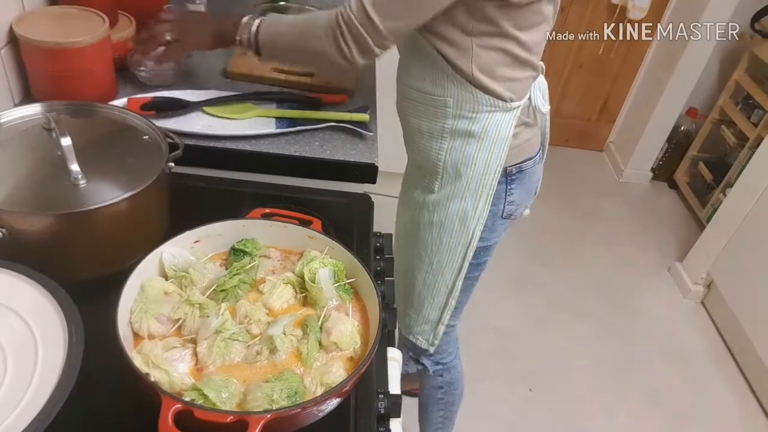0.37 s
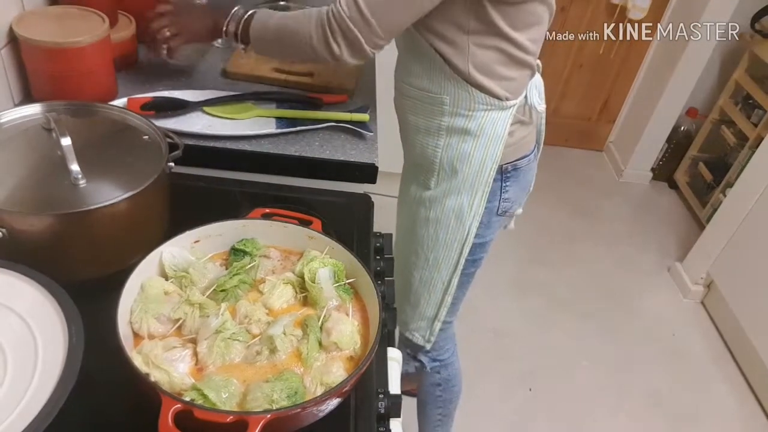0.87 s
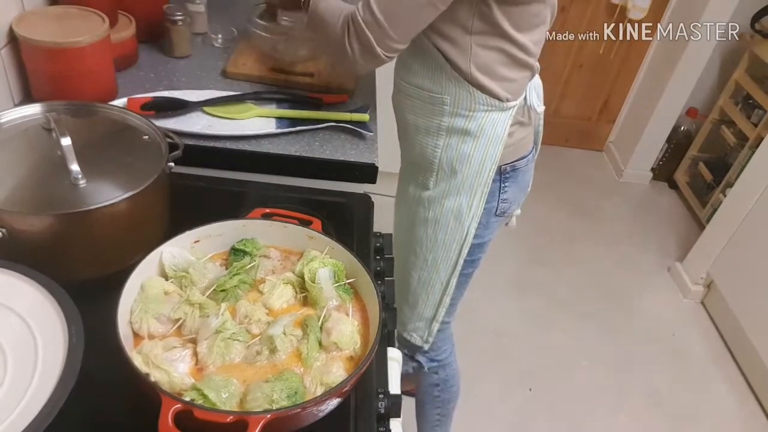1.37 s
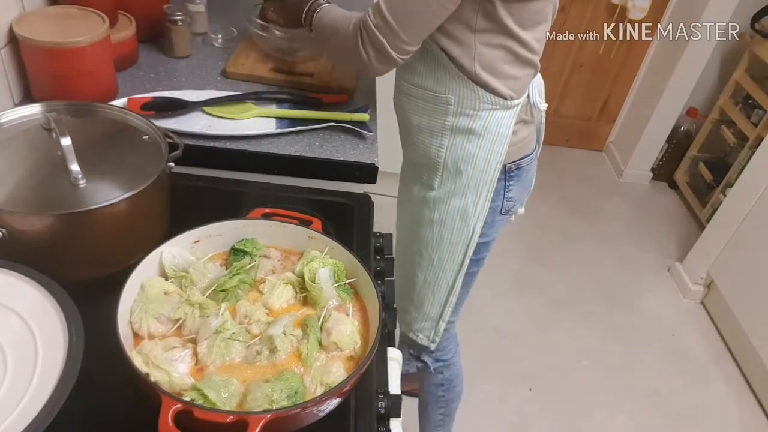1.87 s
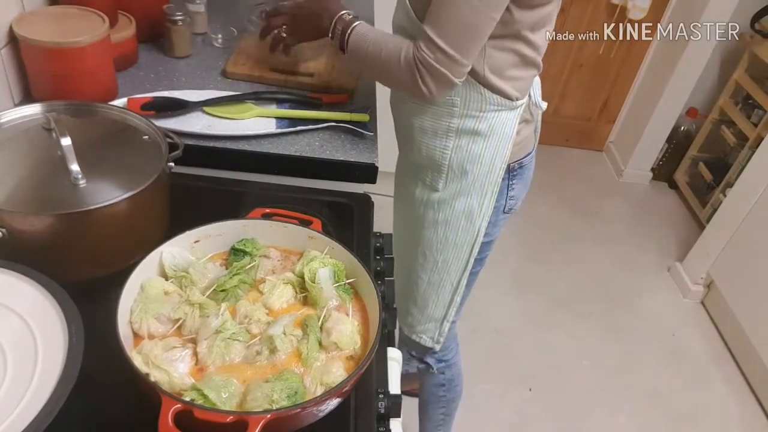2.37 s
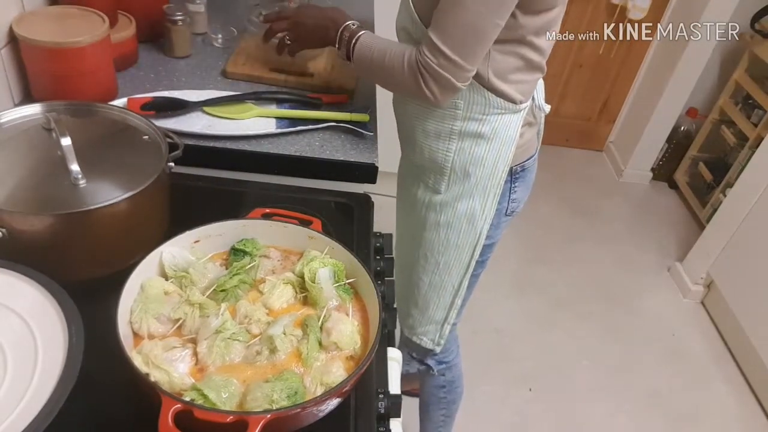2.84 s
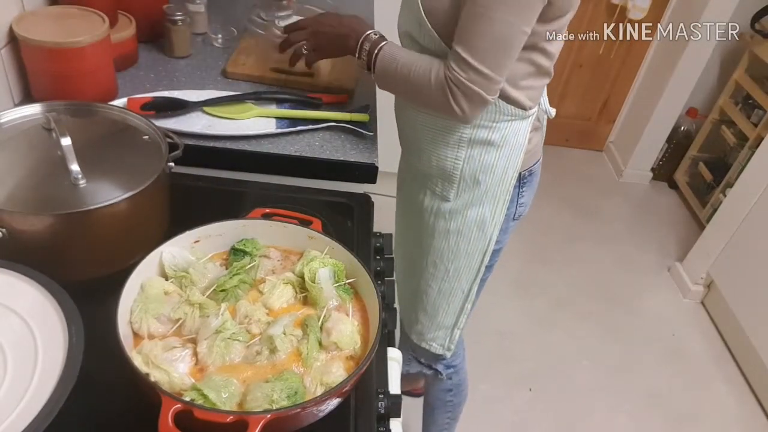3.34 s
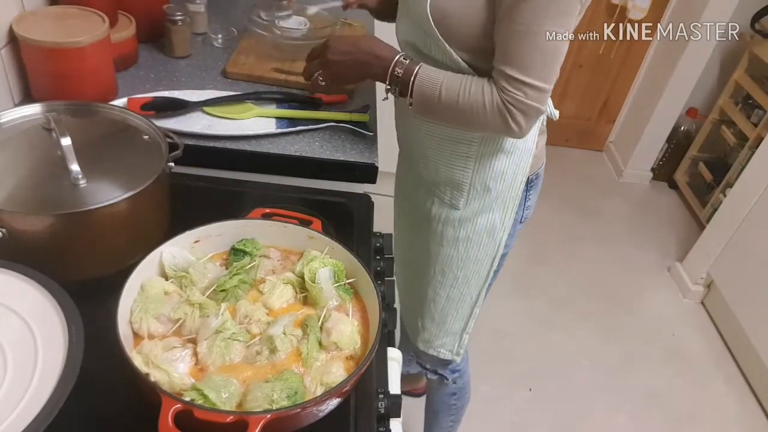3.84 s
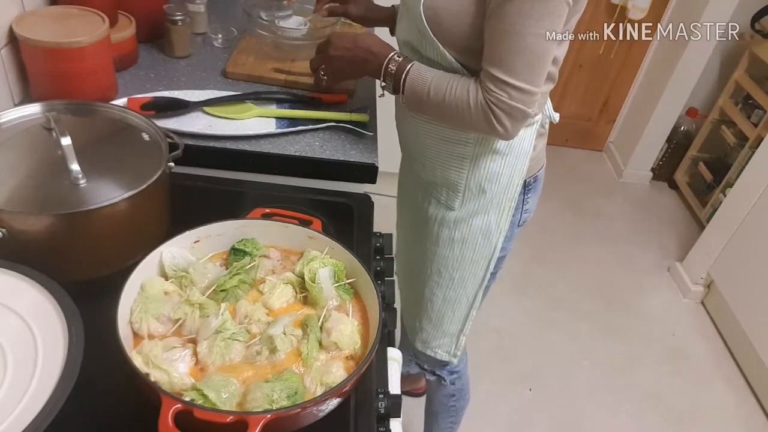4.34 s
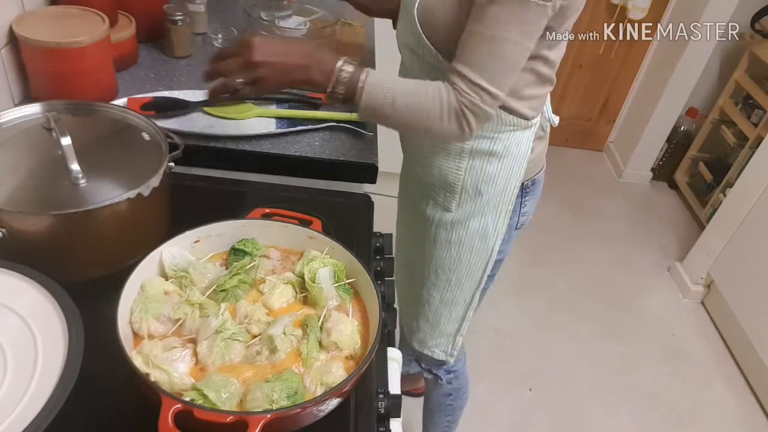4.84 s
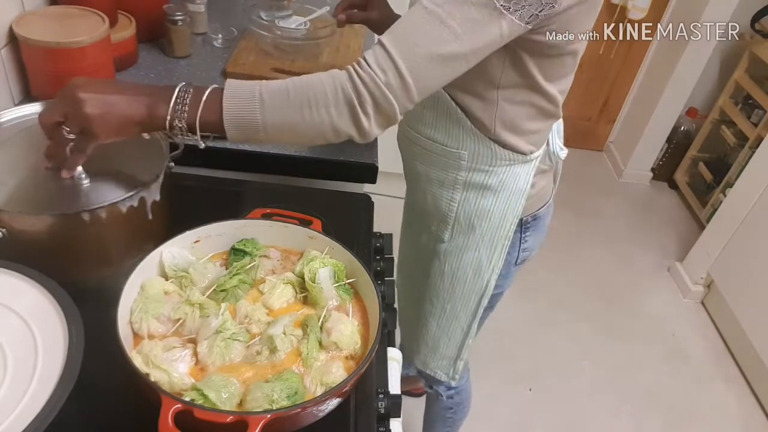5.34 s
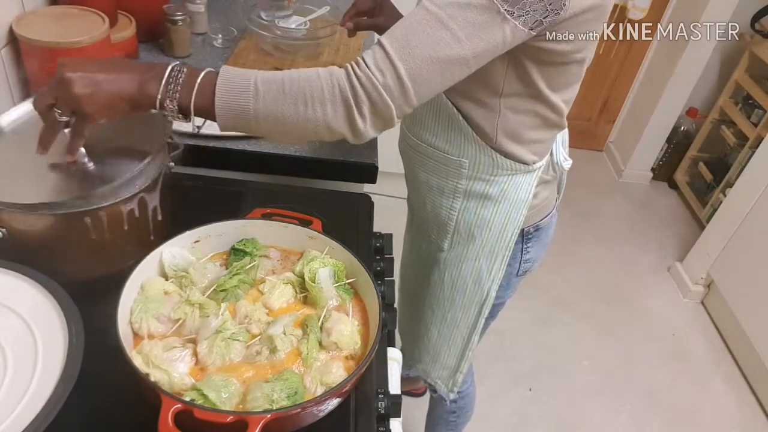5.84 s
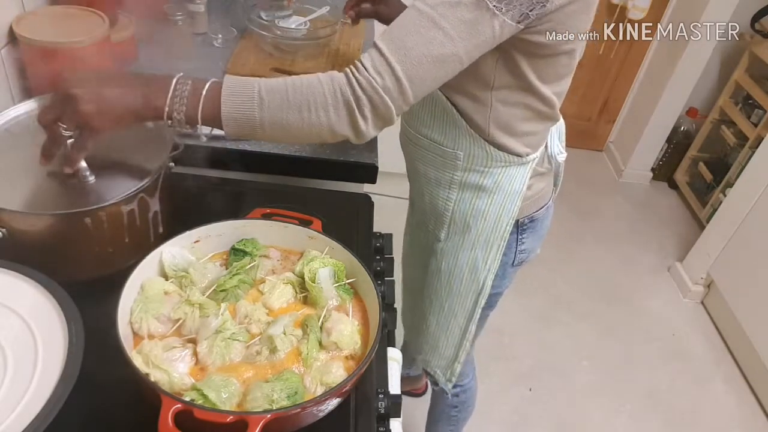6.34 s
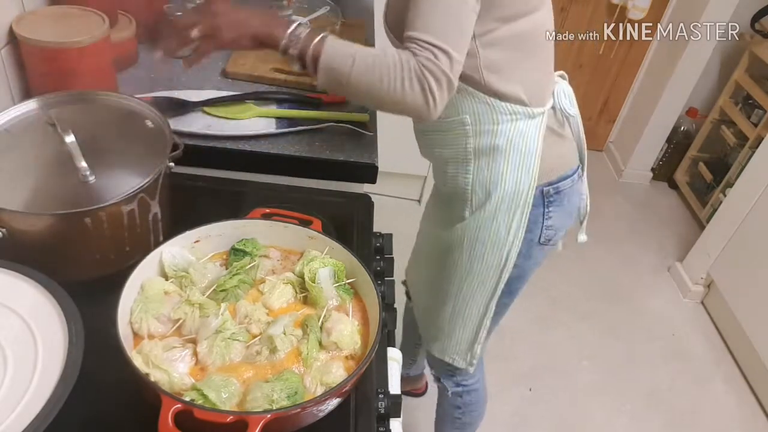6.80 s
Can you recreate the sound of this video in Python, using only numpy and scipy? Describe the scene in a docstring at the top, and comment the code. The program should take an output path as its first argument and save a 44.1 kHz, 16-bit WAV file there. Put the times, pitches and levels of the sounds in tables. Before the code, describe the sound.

In a hard-walled kitchen, glassware knocks and rings, bracelets clink, and a metal lid rattles above a quiet simmer.

```python
"""A kitchen with hard walls, heard by two spaced microphones above the hob, over simmering pots and small ticks.
A wooden board is knocked, metal bangles and a cup clink, then a glass bowl, a dish and a basin are set down.
The boil surges, a glass rings, bangles clink again and a steel lid and rim clatter until about 6.2 s;
then the pots and a sleeve rustle on. Every blow is a short knock of filtered noise plus decaying sine modes;
decaying noise, convolved with the blows and ticks, makes the room that holds them for half a second."""
import sys
import numpy as np
from scipy import signal
from scipy.fft import rfft, irfft, next_fast_len
from scipy.io import wavfile
from scipy.ndimage import uniform_filter1d

SR = 44100
rng = np.random.default_rng(int(sys.argv[2]) if len(sys.argv) > 2 else 0)


def generate_wav(sig):
    """Save sig (samples, or channels by samples) to the path in sys.argv[1] as 16-bit PCM at SR."""
    pcm = np.round(np.clip(np.atleast_2d(sig).T, -1, 1) * 32767).astype(np.int16)
    wavfile.write(sys.argv[1], SR, pcm)


def boost(x):
    """Linear amplitude factor 10**(x/20) for a level x in decibels (scalar or array-like)."""
    u = np.asarray(x, float) / 20
    return 10 ** u


N = 317079


def curve(points, hz):
    """Log-frequency interpolation: a (Hz, value) table is read on a log axis."""
    f, values = np.transpose(points)
    return np.interp(np.log(np.maximum(hz, 1)), np.log(f), values)


def shape(x, gain):
    """Linear filtering: the spectrum of the last axis is multiplied by a gain that is a function of Hz."""
    n = next_fast_len(x.shape[-1])
    hz = np.arange(n // 2 + 1) * SR / n
    return irfft(rfft(x, n) * gain(hz), n)[..., :x.shape[-1]]


def unit(x):
    """Normalization: scales a signal to rms 1."""
    return x / np.sqrt(np.mean(x ** 2))


def pair(n):
    """Spatial coherence: noise at two spaced microphones is alike in the bass, unrelated above."""
    alike_hz = 525  # well below this both microphones hear the same
    mid, side = rng.standard_normal((2, n))
    side = shape(side, lambda hz: 1 / np.sqrt(1 + (alike_hz / np.maximum(hz, 1)) ** 2.56))
    return mid + side * np.array([[1], [-1]])


def walk(rate):
    """Random modulation: levels drawn every 1 / rate s and joined by ramps; spread near 1."""
    hold = int(SR / rate)
    steps = np.repeat(rng.standard_normal(N // hold + 1), hold)
    return 1.2 * uniform_filter1d(steps, hold)[:N]


def swells(rows, steady_db):
    """Power addition: the gain of a steady sound plus smooth raised-cosine bumps."""
    t, power = np.arange(N) / SR, boost(steady_db) ** 2
    for s, length, db in rows:
        phase = np.pi * np.clip((t - s) / (2 * length), -.5, .5)
        power = power + (boost(db) * np.cos(phase) ** 2) ** 2
    return np.sqrt(power)


def add(track, s, sound):
    """Superposition: mixes a sound into a track from time s."""
    i = int(s * SR)
    track[..., i:i + sound.shape[-1]] += sound[..., :N - i]


def ringing_modes(modes, flutter):
    """Modal decay: each mode is a sine dying exponentially, at both microphones."""
    hz, _, t60 = np.array(modes)[:, :, None]
    t = np.arange(SR * 3 // 4) / SR
    # above the bass a mode reaches the two microphones a quarter turn apart
    skew = np.pi / 4 * np.clip((hz / 600) ** 2, 0, 1) * (-1) ** np.arange(len(hz))[:, None]
    rings = np.array([np.sin(2 * np.pi * hz * t + ear * skew) for ear in (1, -1)])
    rings = rings * 1000. ** (-t / t60) * (1 - np.exp(-t / 0.0011))
    # slow noise stands for worktop and wall echoes beating with each mode; long rings stay steadier
    beats = unit(shape(rng.standard_normal(rings.shape), lambda f: 1 / (1 + (f / 70) ** 4)))
    depth = flutter * np.clip(0.047 / t60, 0, 1) * np.clip(t / 0.068, 0, 1)
    return rings * (1 + depth * beats)


def knock(colour, knock_s, tilt_db, centre_hz):
    """Impact excitation: a crackling contact close by, and one clap of the same colour for the walls."""
    t = np.arange(1024) / SR
    contact = np.zeros((2, 4096))
    contact[0, 1024:2048] = rng.standard_normal(1024) * np.exp(-t / knock_s)
    contact[1, 1068] = np.sqrt(knock_s * SR / 2)

    def gain(f):
        return boost(curve(colour, f) + tilt_db * np.log2(np.maximum(f, 40) / centre_hz))

    return shape(contact, gain)[:, 980:]  # the crackle starts 1 ms in


def thing(blows, modes, colour, knock_s, flutter, ring_room_db, knock_room_db):
    """Modal synthesis: each blow rings the modes and makes a short knock; a positive tilt brightens both."""
    hz, mode_db, _ = np.array(modes)[:, :, None]
    t = np.arange(SR * 3 // 4) / SR
    rings = ringing_modes(modes, flutter)
    centre_hz = np.exp(np.mean(np.log(hz)))
    near, walls = np.zeros((2, N)), np.zeros(N)
    for s, db, knock_db, tilt_db, pan_db in blows:
        weight = boost(mode_db + tilt_db * np.log2(hz / centre_hz))
        ring = np.sum(rings * weight, axis=1) / np.sqrt(np.sum(weight ** 2)) * boost(db - 6.0)
        crackle, clap = knock(colour, knock_s, tilt_db, centre_hz)
        size = boost(db + knock_db - 8) * np.sqrt(knock_s * SR / 2 / np.sum(clap ** 2))
        sides = boost(np.array([[pan_db], [-pan_db]]) / 2)
        add(near, s, ring * sides)
        add(near, s - .001, crackle * size * sides)
        # the loud first moments of the ring fill the room with a rough band round each mode
        add(walls, s, ring[0] * np.exp(-t / 0.0099) * boost(ring_room_db + 3))
        add(walls, s - .001, clap * size * boost(knock_room_db))
    return near + signal.fftconvolve(walls[None], room(), axes=1)[:, :N]


# Blows on the wooden board. Each row: start in seconds, ring level in dB, knock against ring in dB,
# brightness tilt in dB per octave, lean to the left in dB.
BOARD_HITS = [(.004, -52.5, 38.5, 1.5, -1.8)]
# Modes of the board. Three rows: frequencies in Hz, relative levels in dB, t60 in seconds.
BOARD_MODES = [(130, 410, 640), (-3, -3, -3), (.2, .2, .2)]
# Colour of its knock. Each row: frequency in Hz, gain in dB.
BOARD_COLOUR = [(24, -37), (40, 13), (344, -0.5), (593, -0.5), (744, 1.5), (1230, -13), (1640, -15.5),
                (9000, -51), (11700, -77), (19800, -120)]


def board():
    """Heavy damping: three low modes lie far under the knock."""
    return thing(BOARD_HITS, BOARD_MODES, BOARD_COLOUR, 0.0024, .3, ring_room_db=6, knock_room_db=8.5)


# Blows on the bangles. Each row: start in seconds, ring level in dB, knock against ring in dB,
# brightness tilt in dB per octave, lean to the left in dB.
BANGLE_HITS = [(.428, -48, -1, 2, -1.5), (.445, -22, -1.5, 5.5, 1.5), (.503, -27.5, 4, 13, 2.3),
               (.599, -37.5, -2, 1, 1.5), (.631, -35, -2, 5, 1.5), (.874, -34, -2.5, 3, 0.87),
               (5.079, -23, 2, 1, 0.2), (5.206, -24.5, -6, 5, -1.5), (5.28, -39, 14, -11, -1.5)]
# Modes of the bangles. Three rows: frequencies in Hz, relative levels in dB, t60 in seconds.
BANGLE_MODES = [(6120, 6200, 6270, 10420, 10510, 12650, 13700), (-5, -.6, -6, -6, -9, -9, -16),
                (.08, .3, .08, .08, .12, .05, .04)]
# Colour of their knock. Each row: frequency in Hz, gain in dB.
BANGLE_COLOUR = [(1760, -59), (3000, -16), (6130, 3.5), (7030, -1.5), (10600, -1), (15500, -11.5)]


def bangles():
    """High modes of small metal: every mode lies above 6 kHz."""
    return thing(BANGLE_HITS, BANGLE_MODES, BANGLE_COLOUR, 0.0023, 0.96, ring_room_db=-2.0, knock_room_db=4.0)


# Blows on the cup. Each row: start in seconds, ring level in dB, knock against ring in dB,
# brightness tilt in dB per octave, lean to the left in dB.
CUP_HITS = [(0.4871, -24.5, -18, -0.12, -2), (0.5037, -37, 4, -0.59, 13)]
# Modes of the cup. Three rows: frequencies in Hz, relative levels in dB, t60 in seconds.
CUP_MODES = [(2336, 2557, 3150, 3623, 4172, 5400), (-1.5, -.6, -9, -14, -9, -1),
             (.1, .1, .08, .08, .25, .04)]
# Colour of its knock. Each row: frequency in Hz, gain in dB.
CUP_COLOUR = [(590, -47), (1000, -11), (3940, -16), (4280, -8), (4550, -15), (6000, 1), (7800, -35),
              (13200, -120)]


def cup():
    """Unequal damping: one middle mode outlasts the others."""
    return thing(CUP_HITS, CUP_MODES, CUP_COLOUR, 0.0015, 0.3, ring_room_db=0.5, knock_room_db=10)


# Blow on the bowl. Each row: start in seconds, ring level in dB, knock against ring in dB,
# brightness tilt in dB per octave, lean to the left in dB.
BOWL_HITS = [(1.678, -6, -4, -0.12, -2.5)]
# Modes of the bowl. Three rows: frequencies in Hz, relative levels in dB, t60 in seconds.
BOWL_MODES = [(812, 1434, 1545, 1625, 1912, 2437, 3120, 3908, 5185, 8120, 9911, 11340, 13330),
              (-3, -9, -8, -3, -8, 1, 0, -2.5, -17, -4, -12, -24, -24),
              (.06, .06, .15, .06, .06, .06, .04, .45, .4, .12, .12, .1, .08)]
# Colour of its knock. Each row: frequency in Hz, gain in dB.
BOWL_COLOUR = [(24, -48), (40, -14), (496, -16.5), (686, -8), (3650, -17.5), (4030, -13.5), (4920, -22),
               (8310, -25), (13700, -40), (15500, -64)]


def bowl():
    """Unequal damping: short low modes give way to two lasting ones near 4 and 5 kHz."""
    return thing(BOWL_HITS, BOWL_MODES, BOWL_COLOUR, 0.003, 0.26, ring_room_db=2.5, knock_room_db=9.0)


# Blow on the dish. Each row: start in seconds, ring level in dB, knock against ring in dB,
# brightness tilt in dB per octave, lean to the left in dB.
DISH_HITS = [(2.242, -11, -6.5, -0.1, -2.1)]
# Modes of the dish. Three rows: frequencies in Hz, relative levels in dB, t60 in seconds.
DISH_MODES = [(818, 1722, 1785, 2040, 2294, 2440, 2617, 3930, 4215, 9695),
              (-12, 1.5, -.6, -3, -4, -3, -3, -10, -11, -28),
              (.08, .07, .06, .06, .05, .04, .05, .2, .04, .15)]
# Colour of its knock. Each row: frequency in Hz, gain in dB.
DISH_COLOUR = [(35, -49), (60, -11.5), (849, -8), (1150, -3), (2360, -3), (4030, -10), (8870, -32),
               (9970, -28), (15500, -36)]


def dish():
    """Strong damping: crowded modes round 2 kHz die quickly after a very short contact."""
    return thing(DISH_HITS, DISH_MODES, DISH_COLOUR, 0.00063, 0.33, ring_room_db=4.5, knock_room_db=13.5)


# Blows on the basin. Each row: start in seconds, ring level in dB, knock against ring in dB,
# brightness tilt in dB per octave, lean to the left in dB.
BASIN_HITS = [(2.504, -28, -2, 2, 1), (2.573, -15, -25, -2.5, 1.3), (2.582, -9, -10, 2.5, 0.51),
              (2.597, -19, -3, 3, .6), (2.631, -29, 6.5, 2, 1.1), (2.664, -15.5, -43, -2, -1.4),
              (2.69, -48, 6, 2, .6), (2.722, -36.5, 2.5, 2, .6), (3.178, -14.5, -13.5, 1, 0.52),
              (3.251, -28, -15, 5, 1.5)]
# Modes of the basin. Three rows: frequencies in Hz, relative levels in dB, t60 in seconds.
BASIN_MODES = [(705, 1546, 1630, 2080, 2830, 2900, 4303, 4370, 5001, 6010, 8040, 9308, 10000, 12130),
               (-4, -4, -2, -4, -2, -3, -1, -1, -16, -9, -13, -22, -21, -23),
               (.08, .12, .14, .1, .1, .06, .2, .07, .1, .11, .06, .06, .06, .06)]
# Colour of its knock. Each row: frequency in Hz, gain in dB.
BASIN_COLOUR = [(24, -53), (40, -44), (117, 12.5), (484, -3.5), (704, 4), (1410, -1.5), (1560, 2.5),
                (4350, -11.5), (6640, -26), (15500, -36)]


def basin():
    """Repeated impact: a run of blows rings the same widely spread modes."""
    return thing(BASIN_HITS, BASIN_MODES, BASIN_COLOUR, 0.0041, 0.17, ring_room_db=0.0, knock_room_db=13)


# Blow on the glass. Each row: start in seconds, ring level in dB, knock against ring in dB,
# brightness tilt in dB per octave, lean to the left in dB.
GLASS_HITS = [(4.175, -16, -9.5, -0.3, 1)]
# Modes of the glass. Three rows: frequencies in Hz, relative levels in dB, t60 in seconds.
GLASS_MODES = [(5183, 5430, 5610, 12768), (-.6, -4, -6, -2.5), (.33, .05, .12, .27)]
# Colour of its knock. Each row: frequency in Hz, gain in dB.
GLASS_COLOUR = [(1500, -13), (3000, -5), (6000, -2), (9000, -6), (10000, -12), (12000, 5), (14000, -34)]


def glass():
    """Sparse modes: a few high, lightly damped ones make a clear ping."""
    return thing(GLASS_HITS, GLASS_MODES, GLASS_COLOUR, .0012, 0.33, ring_room_db=4, knock_room_db=8.5)


# Blows of the steel lid. Each row: start in seconds, ring level in dB, knock against ring in dB,
# brightness tilt in dB per octave, lean to the left in dB.
LID_HITS = [(5.265, -23, 1, 0.3, 0.29), (5.335, -29.5, 0.5, -2.5, .3), (5.428, -23.5, 2, 0.2, -1.3),
            (5.46, -25, -8.5, 10.5, .6), (6.053, -17, 2, 2.6, -1.4), (6.075, -15, -24, 3, 0.36),
            (6.098, -15, -20, 2.5, 0.19), (6.129, -18, -0.5, 2, -2), (6.155, -19.5, -21, 6.5, 0.6),
            (6.18, -19.5, -14, 4, 0.73)]
# Modes of the lid. Three rows: frequencies in Hz, relative levels in dB, t60 in seconds.
LID_MODES = [(120, 148, 330, 660, 750, 1026, 1042, 1280, 1340, 1385, 2350, 3165, 3760),
             (-2, -2, -6, -5, -6, 0, -6, -8, -5, -5, -15, -20, -20),
             (.12, .12, .08, .08, .06, .4, .06, .05, .06, .06, .04, .05, .03)]
# Colour of its knock. Each row: frequency in Hz, gain in dB.
LID_COLOUR = [(40, -42), (130, -1), (400, 3.5), (900, -6), (2000, -7.5), (4000, -13.5), (8000, -18.5),
              (12000, -20), (15500, -26.5)]


def lid():
    """Plate-like modes: low, short ones surround one lasting mode near 1 kHz."""
    return thing(LID_HITS, LID_MODES, LID_COLOUR, 0.0029, 1.0, ring_room_db=3.5, knock_room_db=8.5)


# Blows on the rim. Each row: start in seconds, ring level in dB, knock against ring in dB,
# brightness tilt in dB per octave, lean to the left in dB.
RIM_HITS = [(5.383, -31, .6, 0, -1.5), (5.645, -38, .6, 2, 1.5), (5.897, -18, 1.8, 3, 0.9),
            (5.913, -23, 0.68, -1.1, 0.15)]
# Modes of the rim. Three rows: frequencies in Hz, relative levels in dB, t60 in seconds.
RIM_MODES = [(118, 1560, 3180, 4100, 5030, 6590, 7720, 8230, 10600, 12100),
             (-.5, -3, -9, -9, -9, -14, -9, -11, -13, -9),
             (.18, .15, .07, .1, .08, .08, .08, .08, .08, .12)]
# Colour of its knock. Each row: frequency in Hz, gain in dB.
RIM_COLOUR = [(40, -28), (120, -1.5), (600, -8), (1500, -4), (1900, -18), (3000, -11), (8000, -20.5),
              (15500, -21.5)]


def rim():
    """Wideband modes: one low thump and a ladder of higher partials."""
    return thing(RIM_HITS, RIM_MODES, RIM_COLOUR, 0.0017, 0.17, ring_room_db=-4.0, knock_room_db=14)


def ping(t, db, hz, cycles):
    """Damped oscillation: a sine that falls to 1/e in the given number of cycles."""
    return boost(db) * np.sin(2 * np.pi * hz * t) * np.exp(-t * hz / cycles)


# Ticks, short pings of metal and glass, and one loud crack of the rim. Each row: start in seconds,
# level in dB, frequency in Hz, decay to 1/e in cycles.
TICK_PINGS = [(.183, -52, 10460, 46), (0.965, -35, 2700, 1.1), (1.211, -41.5, 2310, 3.2),
              (1.342, -40, 9300, 2.6), (1.438, -49, 2280, 4), (3.086, -46, 1510, 2),
              (3.116, -41.5, 1210, 3.7), (3.71, -42, 1010, 1.3), (3.738, -39, 2330, 1.2),
              (3.875, -40, 1990, 4.4), (4.095, -45, 1990, 4.5), (4.831, -35, 4220, 5.1),
              (5.115, -36, 2140, 2.5), (4.591, -48, 5480, 56), (5.267, -31.5, 3790, 12),
              (5.267, -44, 7260, 45), (5.896, -16, 7950, 5.8), (6.129, -40, 6060, 2),
              (6.583, -46, 12500, 82)]


def ticks():
    """Damped oscillation and random impulses: ticks and fine spray excite the room, bubbles pop close by."""
    t, dry, pops = np.arange(2000) / SR, np.zeros(N), np.zeros(N)
    for s, db, hz, cycles in TICK_PINGS:
        add(dry, s, ping(t, db, hz, cycles))
    for when, pitch, size in rng.random((120, 3)):
        add(pops, when * (N - len(t)) / SR, ping(t, -52.5 + 7.3 * size, 700 * 2 ** (1.6 * pitch), 3))
    # about 14 spits a second, in a band round 7.7 kHz
    spits = (rng.random(N) < 14 / SR) * boost(-32 + 2 * rng.standard_normal(N))
    spray = shape(spits, lambda f: 1 / (1 + ((f - 7700) / 900) ** 4))
    echoes = signal.fftconvolve((dry + spray)[None], room(), axes=1)[:, :N]
    return dry + spray + pops + boost(3.0) * echoes


# How hard the pots boil. Each row: time in seconds, drive in dB over the quiet boil.
BOIL_DRIVE = [(0, 0.5), (1.0, -3), (3.1, 1), (3.5, -2), (3.7, -3.5), (3.87, 13), (4.0, 4), (4.3, 8.5),
              (4.42, 3.5), (4.5, 6.5), (4.86, 6), (5.24, 11), (5.6, 0.5), (5.85, -4.5), (6.4, 1.5),
              (6.6, -1), (7.0, -1), (7.19, 5.5)]


def boil():
    """Common drive: one level moves the rumble fully, the simmer by about two thirds; the hiss hardly moves."""
    return np.interp(np.arange(N) / SR, *np.transpose(BOIL_DRIVE))


# Resonances of the pot walls. Each row: centre in Hz, full width at half amplitude in Hz, relative level in dB.
POT_RESONANCES = [(80, 54, -7.5), (112, 19, -3.5), (155.8, 24, -3.5), (223, 40, -10.5), (337.3, 59, -5),
                  (450, 300, -4.5)]
# Low swells in the pot walls. Each row: middle in seconds, half length in seconds, level in dB.
POT_SWELLS = [(.74, 0.11, -57.5), (5.14, 0.062, -43.5), (6.87, 0.18, -59)]


def rumble(boil_db):
    """Resonant filtering: boiling drums on the pot walls as wavering bands of noise."""
    bands = 0
    for hz, width, db in POT_RESONANCES:
        band = shape(pair(N), lambda f: 1 / (1 + (2 * (f - hz) / width) ** 2))
        bands = bands + boost(db + 2.0 * walk(6)) * unit(band)
    return unit(bands) * swells(POT_SWELLS, -61.5 + boil_db)


# Colour of the bubble patter. Each row: frequency in Hz, gain in dB.
SIMMER_COLOUR = [(250, -22.5), (400, -2), (800, 0.5), (1400, 0), (2200, -7), (4000, -15), (7000, -33)]


def simmer(boil_db):
    """Random amplitude modulation: bubbles burst in a patter of noise, its level redrawn 40 times a second."""
    patter = boost(1.5 * walk(40)) * shape(pair(N), lambda f: boost(curve(SIMMER_COLOUR, f)))
    return unit(patter) * boost(-58.5 + 0.64 * boil_db)


# Colour of steam and cloth. Each row: frequency in Hz, gain in dB.
HISS_COLOUR = [(1500, 6.5), (3000, 10.5), (5000, 10.5), (7600, 8), (10000, 8), (13000, 6.5), (16000, -4.5)]
# Sleeve and apron rustle. Each row: middle in seconds, half length in seconds, level in dB.
CLOTH_RUSTLES = [(3.88, 0.051, -63), (4.65, 0.12, -55.5), (4.94, 0.11, -48), (5.22, 0.48, -53.5),
                 (6.75, 0.22, -51), (6.86, 0.2, -52), (7.15, 0.095, -55)]


def hiss(boil_db):
    """Turbulence and friction noise: steam and cloth share one almost steady hiss, swelling at each rustle."""
    noise = boost(1.23 * walk(60)) * shape(pair(N), lambda f: boost(curve(HISS_COLOUR, f)))
    return unit(noise) * swells(CLOTH_RUSTLES, -59.5 + 0.04 * boil_db)


def stove():
    """Superposition: rumble, simmer and hiss add up."""
    boil_db = boil()
    return rumble(boil_db) + simmer(boil_db) + hiss(boil_db)


# Decay of the room. Each row: octave centre in Hz, t60 in seconds.
ROOM_DECAY = [(60, 0.84), (125, 0.44), (250, 0.54), (500, 0.44), (1000, 0.5), (2000, 0.49), (4000, 0.43),
              (8000, 0.45), (16000, 0.28)]


def room():
    """Diffuse reverberation: echoes from one spot, dense after a few ms, each octave dying at its own rate."""
    t, echoes = np.arange(SR * 3 // 4) / SR, 0
    noise = pair(len(t))
    for hz, t60 in ROOM_DECAY:
        octave = shape(noise, lambda f: np.clip(1 - np.abs(np.log2(np.maximum(f, 1) / hz)), 0, 1))
        echoes = echoes + octave * 1000. ** (-t / t60) / np.sqrt(t60)
    echoes = echoes * np.clip((t - .0015) / 0.0038, 0, 1)
    return echoes / np.sqrt(np.mean(np.sum(echoes ** 2, axis=1)))


def scene():
    """Superposition: every thing stands at its own spot, so each has its own echoes."""
    bowls = cup() + bowl() + dish() + basin() + glass()
    return board() + bangles() + bowls + lid() + rim() + ticks() + stove()


def low_pass(x):
    """Removes everything above the highest recorded frequency."""
    return signal.sosfilt(signal.butter(12, 16470, fs=SR, output="sos"), x)


def record(dry):
    """Band limiting: the microphones lose the deepest bass and the top, and the left is a little weaker."""
    heard = shape(dry, lambda hz: 1 / np.sqrt(1 + (60 / np.maximum(hz, 1)) ** 6 + (hz / 15100) ** 40))
    mix = heard * boost(np.array([[-.4], [.4]]))
    return low_pass(mix)


dry = scene()
out = record(dry)
generate_wav(out)
```